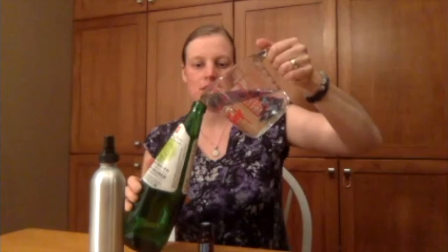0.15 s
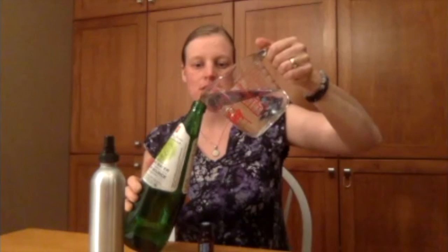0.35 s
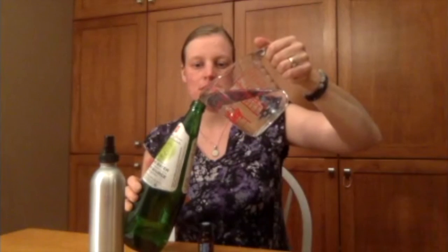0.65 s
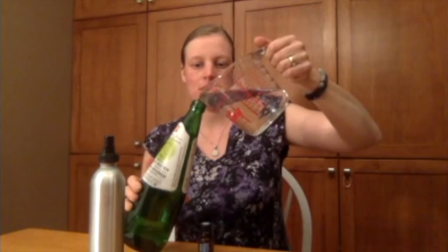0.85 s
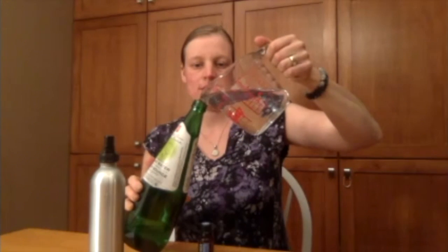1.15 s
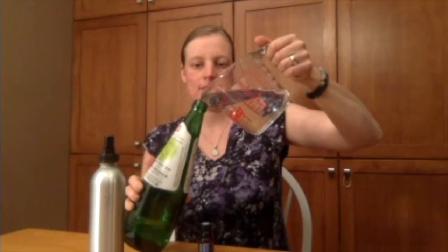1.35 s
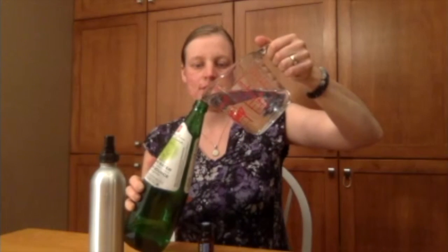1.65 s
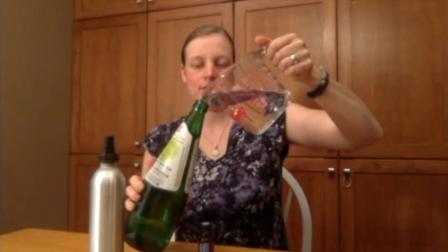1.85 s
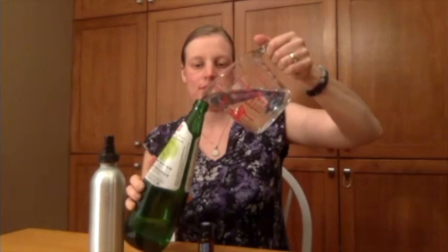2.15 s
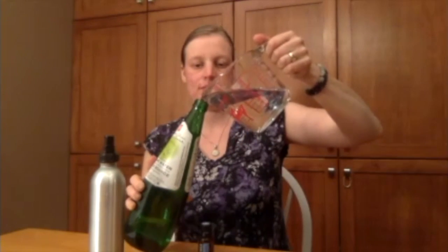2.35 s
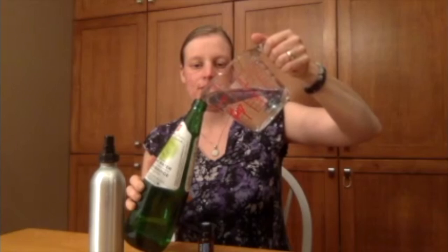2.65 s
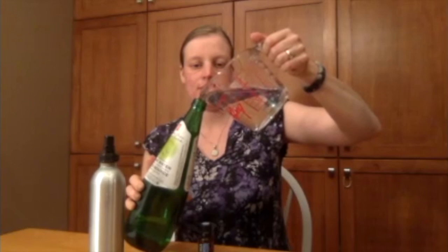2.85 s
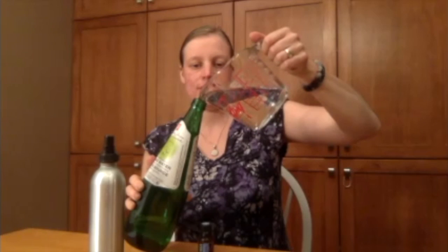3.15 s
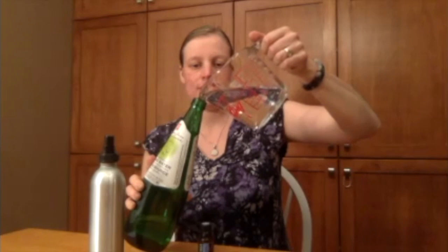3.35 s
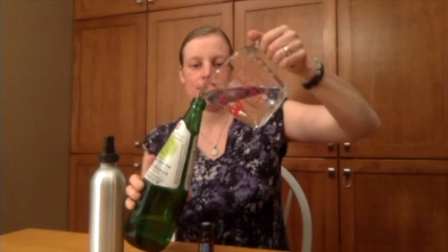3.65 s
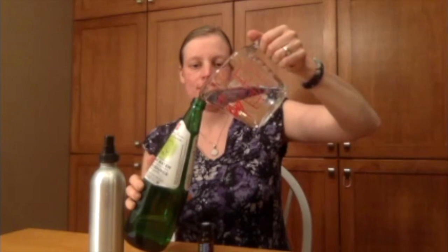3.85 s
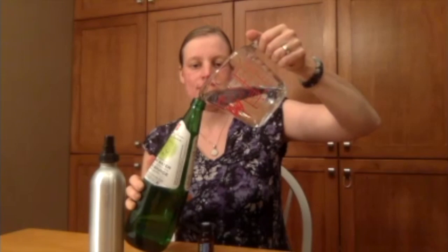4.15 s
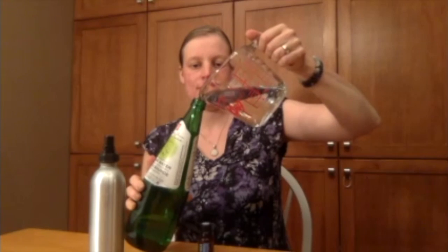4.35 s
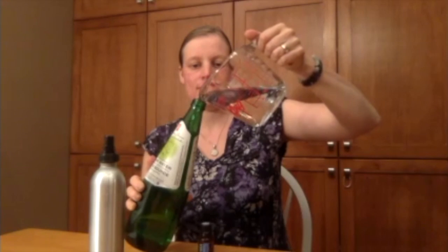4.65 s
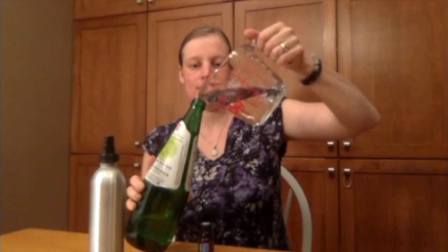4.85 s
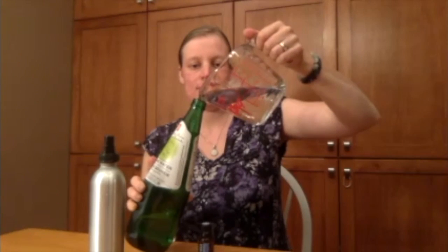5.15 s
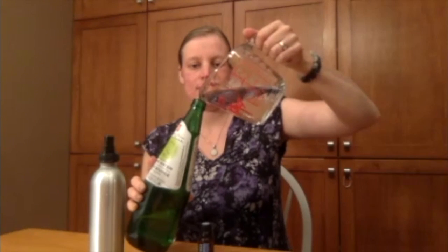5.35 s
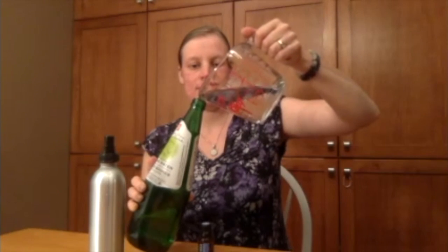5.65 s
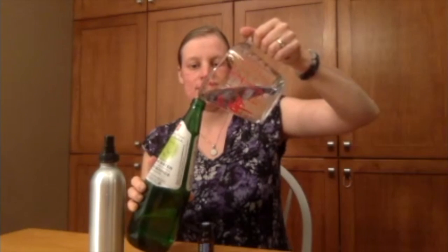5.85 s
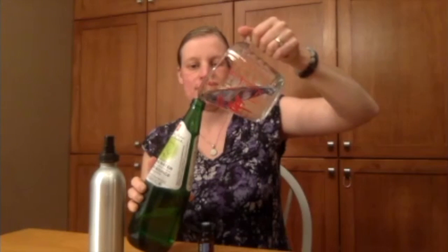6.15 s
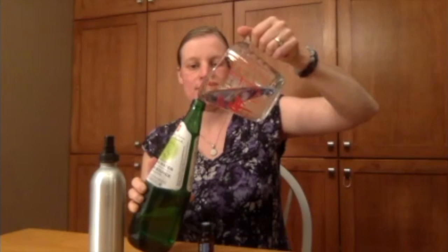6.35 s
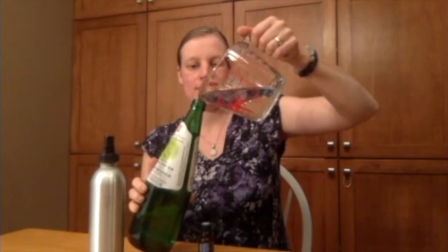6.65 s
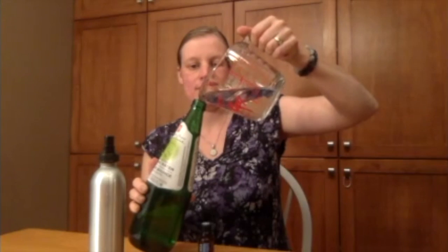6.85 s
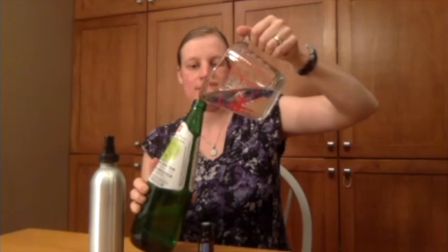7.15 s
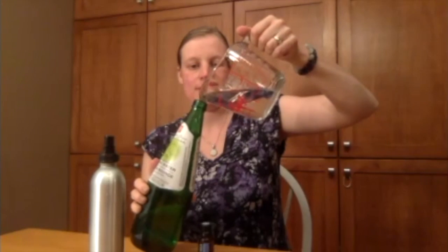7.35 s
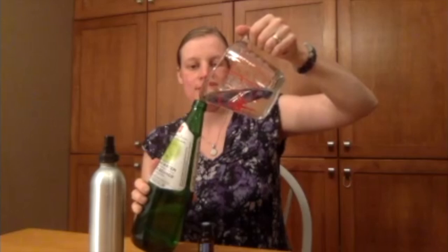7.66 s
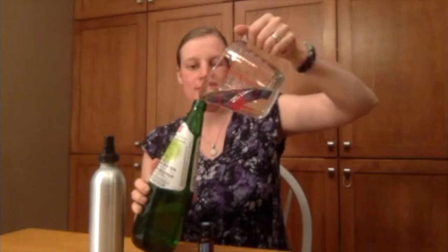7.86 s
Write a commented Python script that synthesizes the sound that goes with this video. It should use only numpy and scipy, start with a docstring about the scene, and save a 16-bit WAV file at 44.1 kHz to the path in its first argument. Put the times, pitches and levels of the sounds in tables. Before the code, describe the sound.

Sparse glassy drips in a quiet kitchen thicken into bubbling, gurgling pouring inside a glass bottle; a woody thud sounds halfway through.

```python
"""A motor hums over a low room rumble as a thin stream of water runs from a jug down the wall of a narrow
glass bottle in a quiet kitchen. Each bubble pings at its own pitch and rings the bottle's gliding resonances;
clear small bubbles throw puffs of hiss, and large ones draw out into gurgles. Two soft low bumps come,
then a dull knock rings woodwork and booms. Hum is wavering tones; rumble, hiss and boom are shaped noise."""
import sys
import numpy as np
from scipy import signal
from scipy.fft import rfft, irfft
from scipy.io import wavfile

SR = 44100
rng = np.random.default_rng(int(sys.argv[2]) if len(sys.argv) > 2 else 0)


def transcribe(signal):
    """Save signal, clipped to [-1, 1], as a 16-bit WAV file at the path in sys.argv[1]."""
    frames = np.atleast_2d(signal).T
    limited = np.clip(frames, -1, 1)
    pcm = np.round(limited * 32767).astype(np.int16)
    wavfile.write(sys.argv[1], SR, pcm)


N = 353682


def from_db(db):
    """Logarithmic level: decibels become an amplitude gain."""
    return 10 ** (np.asarray(db) / 20)


def rms_one(x):
    """Normalization: a signal is scaled to an rms of 1."""
    return x / np.sqrt(np.mean(x ** 2) + 1e-20)


def one_pole(x, seconds):
    """Exponential relaxation: an impulse decays with this time constant from its own height."""
    return signal.lfilter([1], [1, -np.exp(-1 / (seconds * SR))], x + 1e-18)


def coloured(spectrum, size):
    """Spectral shaping: white noise takes the given (Hz, relative dB per Hz) curve, at rms 1."""
    hz, level_db = np.transpose(spectrum)
    grid = np.maximum(np.arange(size // 2 + 1) * SR / size, 1)
    shape = from_db(np.interp(np.log(grid), np.log(hz), level_db))
    return rms_one(irfft(rfft(rng.standard_normal(size)) * shape, size))


def drift(rate):
    """Slow random modulation: straight lines join normal random points, this many per second."""
    points = rng.standard_normal(int(N / SR * rate) + 2)
    return np.interp(np.arange(N) / SR * rate, np.arange(len(points)), points)


# Motor tones. Each row: frequency in Hz, level in dB rms, waver as a share of the steady tone.
HUM = [(121.4, -70, 0.16), (178.5, -69, 0.54), (197.6, -68.5, 0.56), (242.3, -70.5, 0.32)]


def hum():
    """Narrow-band modulation: slow complex noise makes each motor tone a wavering line."""
    out, t = 0, np.arange(N) / SR
    for hz, level_db, share in HUM:
        waver = 1 + share * (drift(4.0) + 1j * drift(4.0))
        tone = np.real(waver * np.exp(2j * np.pi * hz * t))
        out = out + from_db(level_db) * rms_one(tone)
    return out


# Spectrum of the room rumble. Each row: frequency in Hz, relative density in dB per Hz.
RUMBLE = [(15, -67), (25, -26.5), (190, -1.5), (415, -8), (628, -23.5), (774, -16.5), (2370, -26),
          (3500, -36.5), (4300, -32), (5300, -35), (10400, -41.5), (12500, -51), (16200, -90)]
RUMBLE_DB = -63.5   # rms


def rumble():
    """Stationary random noise: a fixed, mostly low spectrum sounds steadily."""
    return from_db(RUMBLE_DB) * coloured(RUMBLE, N)


# Spectrum of the spray hiss. Each row: frequency in Hz, relative density in dB per Hz.
SPRAY = [(2000, -23), (4000, -8), (12500, 5.5)]
# Edges of the bands that give each puff its colour. Each entry: frequency in Hz.
SPRAY_EDGES_HZ = [2000, 3500, 5500, 7500, 9500, 11200, 13000]
SPRAY_DB, SPRAY_S = -12.5, 0.037   # offset to each puff's level; decay time constant
SPRAY_UNEVEN_DB, SPRAY_GRAIN_DB, SPRAY_GRAINS_PER_S = 7.5, 3, 270


def spray(small):
    """Noise-burst radiation: each clear small bubble throws a decaying, grainy puff of its own colour."""
    hiss = coloured(SPRAY, N) * from_db(SPRAY_GRAIN_DB * drift(SPRAY_GRAINS_PER_S))
    uneven_db = SPRAY_UNEVEN_DB * rng.standard_normal((len(small), len(SPRAY_EDGES_HZ)))
    at = (small[:, 0] * SR).astype(int)
    out = 0
    for k, edges in enumerate(zip(SPRAY_EDGES_HZ, SPRAY_EDGES_HZ[1:])):
        kicks = np.zeros(N)
        kicks[at] = from_db(small[:, 1] + small[:, 3] + SPRAY_DB + uneven_db[:, k])
        band_pass = signal.butter(2, edges, "band", fs=SR, output="sos")
        out = out + one_pole(kicks, SPRAY_S) * signal.sosfilt(band_pass, hiss)
    return out


SPECK_DB, SPECK_LOW_HZ, SPECK_HIGH_HZ = 4, 7400, 11060


def specks(small):
    """Size sets pitch: one tiny, high bubble in each spray, as rows (s, dB, Hz)."""
    hz = SPECK_LOW_HZ * (SPECK_HIGH_HZ / SPECK_LOW_HZ) ** rng.random(len(small))
    return np.c_[small[:, 0], small[:, 1] + small[:, 3] + SPECK_DB, hz]


TWIN_COUNT, TWIN_S = 2, 0.012   # twins per bubble, within this time
TWIN_DB, TWIN_SPREAD_DB, TWIN_LOW_HZ, TWIN_HIGH_HZ = -14.5, 15, 2360, 7460


def twins(small):
    """Multiple entrainment: a drop traps weaker bubbles as well, as rows (s, dB, Hz)."""
    draw = rng.random((len(small), TWIN_COUNT, 3))
    s = small[:, :1] + TWIN_S * draw[..., 0]
    level_db = small[:, 1:2] + TWIN_DB - TWIN_SPREAD_DB * draw[..., 1]
    hz = TWIN_LOW_HZ * (TWIN_HIGH_HZ / TWIN_LOW_HZ) ** draw[..., 2]
    return np.stack([s, level_db, hz], axis=-1).reshape(-1, 3)


TRAIL_COUNT, TRAIL_S = 6, 0.05   # shed bubbles; scale of their random delays
TRAIL_DB, TRAIL_OCTAVES = -7, 0.14   # strongest level beside the parent; pitch spread either way


def trails(small):
    """Bubble shedding: weaker bubbles of nearby pitch follow, fading with delay, as rows (s, dB, Hz)."""
    draw = rng.random((len(small), TRAIL_COUNT, 3))
    late = -np.log(1 - .95 * draw[..., 0])
    s = small[:, :1] + .004 + TRAIL_S * late
    level_db = small[:, 1:2] + TRAIL_DB - 5.0 * late - 22.0 * draw[..., 1]
    hz = small[:, 2:] * 2 ** (TRAIL_OCTAVES * (2 * draw[..., 2] - 1))
    return np.stack([s, level_db, hz], axis=-1).reshape(-1, 3)


GURGLE_COUNT, GURGLE_S = 6, .08   # bubbles in a run; length of the run
GURGLE_DB, GURGLE_SPREAD_DB, GURGLE_OCTAVES = -6, 9.5, 0.086


def gurgles(large):
    """Succession of like bubbles: a run draws each large one out into a gurgle, as rows (s, dB, Hz)."""
    draw = rng.random((len(large), GURGLE_COUNT, 3))
    s = large[:, :1] + GURGLE_S * (np.arange(GURGLE_COUNT) + draw[..., 0]) / GURGLE_COUNT
    level_db = large[:, 1:2] + GURGLE_DB - GURGLE_SPREAD_DB * draw[..., 1]
    hz = large[:, 2:] * 2 ** (GURGLE_OCTAVES * (2 * draw[..., 2] - 1))
    return np.stack([s, level_db, hz], axis=-1).reshape(-1, 3)


# Strength of the steady trickle between clear bubbles. Each row: time in seconds, level in dB before CALM_DB.
FLOW = [(0.0, -46), (0.69, -58), (1.05, -66), (1.87, -72), (3.24, -50.5), (3.6, -51.5), (4.06, -63),
        (4.31, -58), (5.27, -72), (5.76, -40.5), (6.21, -49), (7.15, -48), (7.3, -39), (7.44, -68),
        (7.6, -46.5), (7.78, -48.5), (8.02, -41.5)]
CALM_DB, BUSY_S, BUSY_SLOPE = 11.5, 0.062, 0.75   # offset to the flow; power decay time; dB per dB of lift


def busy_db(clear, s):
    """Energy summation: the fading power of clear bubbles just before lifts the stream at times s."""
    since = s[:, None] - clear[:, 0]
    power = from_db(2 * clear[:, 1]) * np.exp(-np.abs(since) / BUSY_S) * (since > 0)
    calm_db = np.interp(s, *np.transpose(FLOW)) + CALM_DB
    total_db = 10 * np.log10(power.sum(axis=1) + from_db(2 * calm_db))
    return calm_db + BUSY_SLOPE * (total_db - calm_db)


SMALL_FIRST_PER_S, SMALL_LAST_PER_S = 130, 520   # base rates: bubbles come thicker as the pool deepens
SMALL_LOW_HZ, SMALL_HIGH_HZ, LARGE_BELOW_HZ = 713.3, 12040, 2500
SMALL_SPREAD_DB, SMALL_DB, LARGE_DB = 3.5, -18.5, -16   # exponential spread; offsets to the busy level


def small_bubbles(clear):
    """Clumped random arrivals: faint bubbles of any pitch follow a drifting rate, as rows (s, dB, Hz)."""
    base_rate = np.geomspace(SMALL_FIRST_PER_S, SMALL_LAST_PER_S, N)
    born = np.flatnonzero(rng.random(N) < base_rate * from_db(6.0 * drift(14.0)) / SR)
    draw = rng.random((len(born), 2))
    s = born / SR
    hz = SMALL_LOW_HZ * (SMALL_HIGH_HZ / SMALL_LOW_HZ) ** draw[:, 1]
    large = clear[:, 2] < LARGE_BELOW_HZ
    deepening_db = -7.1 * (1 - s * SR / N)   # large bubbles gain strength as the pool deepens
    large_db = busy_db(clear[large], s) + LARGE_DB + deepening_db
    small_db = busy_db(clear[~large], s) + SMALL_DB
    level_db = np.where(hz < LARGE_BELOW_HZ, large_db, small_db)
    return np.c_[s, level_db - SMALL_SPREAD_DB * np.log(1 - .93 * draw[:, 0]), hz]


PING_Q, RISE_CYCLES = 30.6, 5.0   # quality factor of a free bubble; cycles over which its ring swells


def pings(at, heights, hz):
    """Damped oscillation: each free bubble rings and bends up in pitch as it nears the surface."""
    steps = np.arange(1200)
    cycles = steps * hz[:, None] / SR
    shape = (1 - np.exp(-(cycles / RISE_CYCLES) ** 2)) * np.exp(-np.pi * cycles / PING_Q)
    bend = cycles * (1 + 0.0029 * rng.random((len(hz), 1)) * np.minimum(cycles, 2 * PING_Q))
    rings = heights[:, None] * shape * np.sin(2 * np.pi * bend)
    return np.bincount((at[:, None] + steps).ravel(), rings.ravel(), N)[:N]


SNAP_DB, SNAP_GROWTH = -26, 1.1   # strength for a bubble of -26.5 dB; dB gained per dB


def snap(peak_db):
    """Broadband excitation: louder bubbles snap disproportionately harder beside their ring."""
    return from_db(SNAP_DB + SNAP_GROWTH * (peak_db + 26.5))


def reach(rows):
    """Resonant coupling: the nearer a bubble's pitch to a resonance, the harder it drives it."""
    first, last, level_db, t60 = np.transpose(BOTTLE)
    s, peak_db, hz = np.transpose(rows)[:, :, None]
    off = (first + (last - first) * s * SR / N - hz) / (hz / PING_Q)
    return from_db(level_db) * (1 / (1 + off ** 2) + snap(peak_db))


FROTH_DB, FROTH_S, FROTH_WIDTH = -15, 0.03, 0.081   # level; amplitude decay; width as a share of pitch


def froth(kicks, hz, noise):
    """Narrow-band noise: froth keeps a struck resonance hissing while the kicks' power fades."""
    seconds = 1 / (np.pi * FROTH_WIDTH * hz)
    band = one_pole(one_pole(noise, seconds), seconds)
    envelope = np.sqrt(one_pole(np.abs(kicks) ** 2, FROTH_S / 2))
    return from_db(FROTH_DB) * envelope * band / np.std(band)


# Bottle resonances: the air column shortens and rises, wet glass and cross modes sink.
# Each row: frequency in Hz at first, frequency in Hz at last, relative level in dB, 60 dB decay in seconds.
BOTTLE = [(847, 920, -10, 0.047), (1004, 1185, -7, 0.19), (1570, 2015, -13.5, 0.21),
          (2260, 2560, -8.5, 0.21), (2726, 2590, 3.5, 0.073), (3130, 3620, -6.5, 0.051),
          (4440, 3760, 6, 0.028), (4930, 4310, 1.5, 0.031), (6110, 5800, -4, 0.033),
          (6680, 6900, -5.5, 0.027), (7250, 6450, -1, 0.028), (7990, 7030, -10, 0.046),
          (9620, 5200, -6.5, 0.028), (10100, 8500, -11.5, 0.034), (10550, 10300, -12, 0.035)]
SLOSH_SHARE, SLOSH_PER_S = .012, 20.0   # pitch share of the detuning once full; random points per second


def bottle(at, strengths):
    """Modal resonance: bubbles strike gliding modes, detuned more by the moving surface as it fills."""
    out = np.zeros(N)
    turns = np.exp(2j * np.pi * rng.random(strengths.shape))   # random starting phases
    noise = rng.standard_normal(N) + 1j * rng.standard_normal(N)
    for k, (first, last, level_db, t60) in enumerate(BOTTLE):
        kicks = np.zeros(N, complex)
        np.add.at(kicks, at, strengths[:, k] * turns[:, k])
        rise = RISE_CYCLES / first / 4
        soft_kicks = one_pole(one_pole(kicks, rise), rise) / (rise * SR) ** 2
        swell = one_pole(soft_kicks, t60 / np.log(1000))
        swell += froth(kicks, first, np.roll(noise, k * SR // 2))
        slosh = SLOSH_SHARE * np.linspace(.2, 1, N) * drift(SLOSH_PER_S)
        hz = np.linspace(first, last, N) * (1 + slosh)
        out += np.real(swell * np.exp(2j * np.pi * np.cumsum(hz) / SR))
    return out


# Clearest small bubbles. Each row: start in seconds, level in dB, pitch in Hz,
# spray in dB beside that level before the spray and speck offsets.
BUBBLES = [(0.0465, -35, 4500, -26), (0.1512, -44, 2610, -16), (0.181, -37.5, 3050, -24),
           (0.2903, -51.5, 2690, 1), (0.3222, -41, 4740, -33), (0.357, -47.5, 2730, -30),
           (0.491, -45.5, 4800, -24), (0.5932, -46.5, 2720, -11.5), (0.7329, -44.5, 2684, -42),
           (0.762, -43, 7340, -30), (0.8096, -47.5, 2650, -40), (0.867, -50, 10550, -22),
           (0.8824, -35.5, 2750, -22), (1.0322, -35.5, 6960, -12), (1.0473, -23.5, 2700, -36),
           (1.1837, -41, 8800, -5), (1.2534, -32.5, 2610, -35), (1.4718, -46.5, 3940, -5),
           (1.5212, -36.5, 4680, -34), (1.6077, -48.5, 4040, -40), (1.6547, -45, 7050, -14),
           (1.7424, -37.5, 4520, -44), (1.9976, -45, 10540, -32), (2.0812, -40.5, 7260, -28),
           (2.1555, -50.5, 10300, -29), (2.2548, -39, 7100, -51), (2.3886, -37.5, 3890, -22),
           (2.423, -37.5, 4160, -34), (2.5467, -42.5, 3020, -11), (2.705, -44, 3960, -8),
           (2.837, -48, 4230, -15), (2.8752, -36.5, 3870, -46), (2.9658, -36.5, 2930, -11),
           (3.0866, -33.5, 4280, -11.5), (3.2184, -38, 9940, -29), (3.3778, -33, 4600, -45),
           (3.6554, -40, 4010, -57), (3.691, -44, 7060, -43), (3.7374, -35.5, 7030, -20),
           (3.7802, -31, 2530, -7), (4.0215, -46.5, 6730, -47), (4.0736, -39.5, 4450, -44),
           (4.1607, -28.5, 4580, -42), (4.1974, -53, 2460, -42), (4.2127, -27.5, 2740, -16),
           (4.5457, -32.5, 6440, -26), (4.7001, -30, 2630, -20.5), (4.84, -38.5, 4220, -37),
           (4.9204, -38, 4520, -5.5), (4.9573, -28, 4285, -37), (5.033, -33.5, 3950, -58),
           (5.1577, -38.5, 4370, -8), (5.218, -34, 4300, -18), (5.312, -35.5, 3900, -35),
           (5.3773, -43.5, 3800, -1.5), (5.438, -30.5, 6500, -4), (5.5238, -39.5, 2810, -29),
           (5.5874, -29.5, 6360, -22), (5.6542, -24.5, 4380, -14.5), (5.7284, -23, 4460, -13),
           (5.8571, -34, 2556, -15), (5.914, -31, 2700, -33), (5.9936, -28, 6240, -15),
           (6.0358, -35, 2630, -46), (6.0674, -30, 2518, -41), (6.2003, -39, 2790, -31),
           (6.263, -37.5, 6350, -18), (6.2801, -30.5, 6600, -6), (6.317, -32, 2700, -25),
           (6.3592, -27, 4440, -17), (6.3982, -29, 4790, -5.5), (6.439, -32.5, 6150, -21),
           (6.4849, -29.5, 4190, -37), (6.6286, -29.5, 2870, -39), (6.6728, -29, 6620, -19),
           (6.6937, -33, 3660, -32), (6.7396, -40, 4330, -7.5), (6.7596, -29, 3720, -37),
           (6.8416, -36.5, 2610, -43), (6.8913, -40.5, 4560, -2.5), (6.9374, -34.5, 4380, -15.5),
           (7.1841, -28.5, 2970, -49), (7.2529, -31, 2660, -6), (7.4857, -40, 4140, -5),
           (7.521, -35, 6220, -42), (7.548, -31, 4680, -9), (7.6052, -33.5, 2700, -17),
           (7.671, -42.5, 2390, -43), (7.6912, -29.5, 4710, -16), (7.7338, -30.5, 6060, -28),
           (7.7982, -31, 3540, -2.5), (7.8226, -32, 2690, -12), (2.013, -44, 4250, -27),
           (2.308, -49, 6000, -31), (3.101, -41.5, 2720, -31), (3.286, -45.5, 2670, -32),
           (3.8835, -39.5, 2700, -20), (4.085, -43, 4330, -27), (4.173, -38, 2600, -31),
           (4.63, -46, 3270, -20), (6.0182, -39.5, 3780, -40), (7.918, -41, 4290, -11),
           (2.9811, -36, 10300, -29), (3.051, -38.5, 4100, -15), (3.309, -45.5, 4090, -7.5),
           (3.4406, -41, 10230, -16), (3.4682, -34.5, 4670, -30), (3.487, -35.5, 6300, -37),
           (3.5685, -45.5, 8160, -8), (4.0867, -36.5, 6870, -37), (4.257, -36, 8400, -15),
           (4.4025, -43, 10020, -8), (4.4523, -34.5, 4334, -25), (4.495, -42, 6400, -18),
           (6.0763, -33.5, 5940, -7), (6.098, -35.5, 4220, -29), (6.114, -39, 4100, -33),
           (6.2091, -38.5, 6300, -7), (6.4077, -29, 4320, -12), (7.0557, -43.5, 7200, -3.5),
           (7.208, -31.5, 3650, -28), (7.3082, -36.5, 8030, -7), (7.3255, -39.5, 6240, -20),
           (7.3514, -37.5, 4300, -27), (7.7044, -30, 3770, -10), (7.7697, -33.5, 3660, -25)]
# Large bubbles, low enough to ring the air column. Each row: start in seconds, level in dB, pitch in Hz.
GLUGS = [(1.053, -55, 1620), (3.037, -42.5, 1677), (3.459, -47.5, 1058), (4.239, -47, 1744),
         (5.194, -38, 1032), (5.443, -45.5, 1385), (5.701, -44, 1176), (6.077, -43, 1060),
         (6.523, -36.5, 1085), (6.678, -45.5, 808), (6.742, -39, 1146), (6.811, -33.5, 1120),
         (7.094, -46.5, 1116), (7.222, -41, 1134), (7.334, -47.5, 805), (7.553, -45.5, 884),
         (7.764, -41.5, 1190), (7.9, -41.5, 1150), (3.389, -51, 1057), (1.055, -57.5, 1020),
         (3.053, -47, 1013), (5.715, -41, 823), (6.675, -44.5, 393), (7.763, -36, 829)]
PING_DB, LONE_PING_DB = 0, -14   # free ring beside the strongest bottle drive; part added far from resonance


def water():
    """Superposition: every bubble pings freely and rings the bottle, and the clear small ones spray."""
    small, large = np.array(BUBBLES), np.array(GLUGS)
    clear = np.r_[small[:, :3], large]
    placed = np.r_[clear, trails(small[:, :3]), gurgles(large), twins(small), specks(small)]
    rows = np.r_[placed, small_bubbles(clear)]
    drive = reach(rows)
    ping = from_db(PING_DB) * drive.max(axis=1) + from_db(LONE_PING_DB)
    gain = from_db(rows[:, 1])
    # placed bubbles share their given level between ping and modes
    gain[:len(placed)] /= np.sqrt(np.sum(drive ** 2, axis=1) + ping ** 2)[:len(placed)]
    at = np.minimum((rows[:, 0] * SR).astype(int), N - 1)
    return pings(at, gain * ping, rows[:, 2]) + spray(small) + bottle(at, gain[:, None] * drive)


ROOM_T60_S, ROOM_DB, ROOM_DELAY_S = 0.52, -18.5, 0.0031


def room(x):
    """Reverberation: a dense, exponentially decaying tail, a little duller than the source."""
    t = np.arange(SR // 2) / SR
    tail = rng.standard_normal(len(t)) * from_db(-60 * t / ROOM_T60_S) * (t > ROOM_DELAY_S)
    tail = one_pole(tail, 2.5e-5)
    tail = tail / np.sqrt(np.sum(tail ** 2))
    return from_db(ROOM_DB) * signal.fftconvolve(x, tail)[:N]


# Struck woodwork. Each row: frequency in Hz, relative level in dB, 60 dB decay in seconds before the late fade.
PANEL = [(104, -13.5, 0.59), (122.2, -9, 0.31), (175.4, -5.5, 0.33), (249.5, -8, 0.52), (293.4, -3, 0.39),
         (356, -7.5, .4), (468, -16, 0.67), (597, -19, 0.49), (730, -20, 0.55), (870, -30, .5),
         (1050, -18, 1)]
# Spectrum of the diffuse boom. Each row: frequency in Hz, relative density in dB per Hz.
BOOM = [(29, -72), (55, -40), (100, -5), (170, -5.5), (400, -8), (522, -18.5), (1040, -12.5), (2300, -14),
        (3500, -26.5), (7700, -70)]
# Soft blows. Each row: start in seconds, level in dB, low-pass cut in Hz that softens the blow.
KNOCKS = [(2.236, -44, 96), (4.345, -30, 900), (4.356, -26.5, 1180), (4.389, -30, 930)]
BOOM_DB, BOOM_T60_S, BOOM_RISE_S = -4.5, 0.81, 0.0029   # decay is before the late fade
KNOCK_FADE_S = 0.37   # late in a knock the fade steepens


def knocks():
    """Modal and diffuse response: soft blows ring woodwork while a boom swells and dies around it."""
    out, t = np.zeros(N), np.arange(SR) / SR
    hz, level_db, t60 = np.transpose(PANEL)[:, :, None]
    rings = np.sum(from_db(level_db - 60 * t / t60) * np.sin(2 * np.pi * hz * t), axis=0)
    envelope = (1 - np.exp(-t / BOOM_RISE_S)) * np.exp(-(t / KNOCK_FADE_S) ** 2)
    for s, blow_db, cut_hz in KNOCKS:
        boom = coloured(BOOM, SR) * from_db(BOOM_DB - 60 * t / BOOM_T60_S)
        soft = signal.butter(2, cut_hz, fs=SR, output="sos")
        blow = signal.sosfilt(soft, (rings + boom) * envelope)
        out[int(s * SR):][:SR] += from_db(blow_db) * blow
    return out


# Soft low bumps. Each row: start in seconds, level in dB before the gradual rise.
BUMPS = [(2.242, -48), (2.35, -54.5)]
BUMP_RISE_S, BUMP_HZ, BUMP_T60_S = 0.0081, 77, 0.19


def bumps():
    """Damped oscillation: low swings rise softly and die away fast."""
    s, level_db = np.transpose(BUMPS)[:, :, None]
    t = np.maximum(np.arange(N) / SR - s, 0)
    envelope = from_db(level_db - 60 * t / BUMP_T60_S) * (1 - np.exp(-t / BUMP_RISE_S))
    return np.sum(envelope * np.sin(2 * np.pi * BUMP_HZ * t), axis=0)


def scene():
    """Linear superposition: hum, rumble, water with its room tail, knocks and bumps add up."""
    pour = water()
    return (hum() + rumble() + pour + room(pour) + knocks() + bumps())[None]


CUTOFF_HZ = 12800   # 60 dB down from here up


def record(dry):
    """Band limitation: a steep low-pass cuts the top."""
    return signal.sosfilt(signal.cheby2(12, 60, CUTOFF_HZ, fs=SR, output="sos"), dry)


dry = scene()
out = record(dry)
transcribe(out)
```